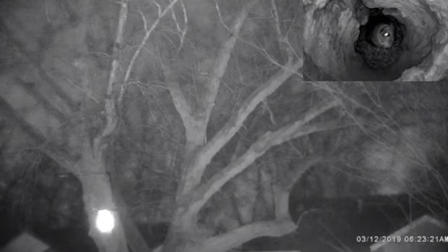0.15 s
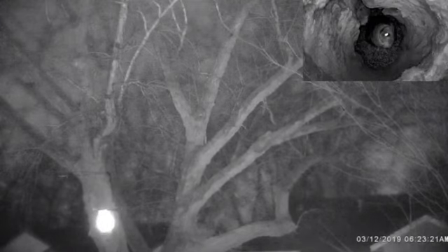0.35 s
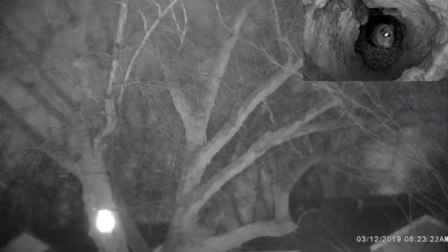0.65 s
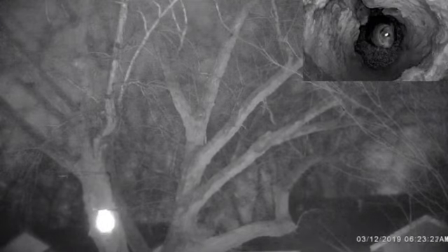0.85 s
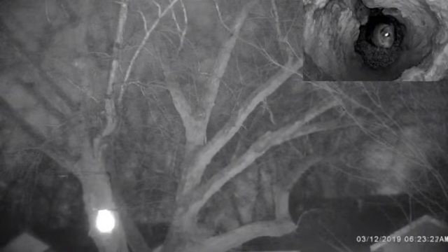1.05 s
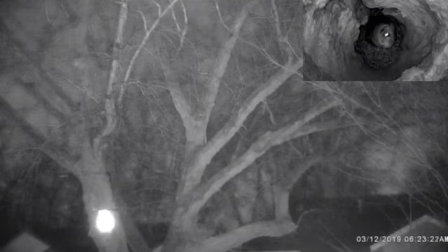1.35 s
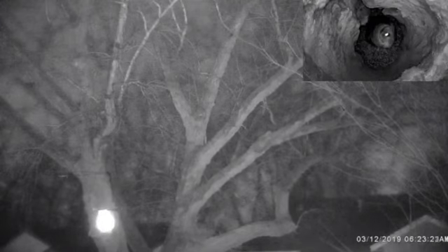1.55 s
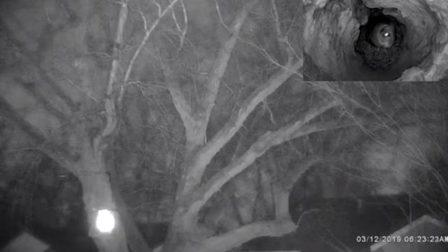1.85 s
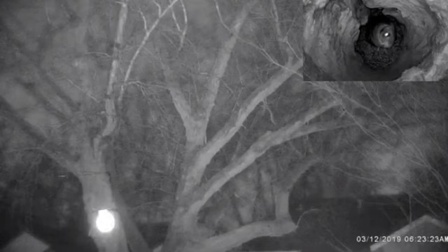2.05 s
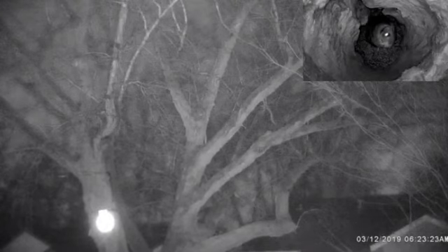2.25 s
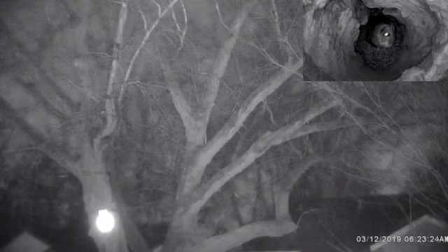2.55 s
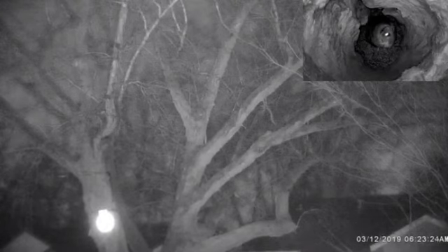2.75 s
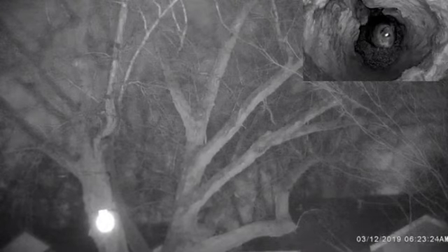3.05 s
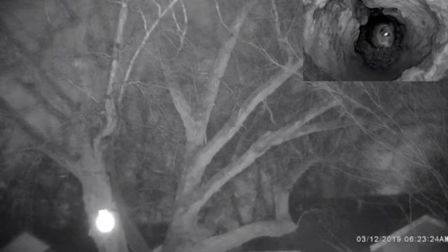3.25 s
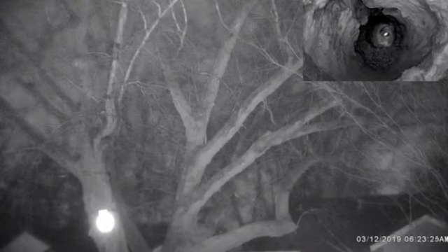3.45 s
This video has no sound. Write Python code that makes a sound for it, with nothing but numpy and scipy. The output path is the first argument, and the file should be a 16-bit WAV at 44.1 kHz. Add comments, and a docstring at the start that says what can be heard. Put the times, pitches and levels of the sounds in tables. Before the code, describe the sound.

A barred owl calls close by at night: nine quick, evenly spaced rising hoots, then one long swooping, quavering note. Soft low thumps and knocks on wood accompany the early hoots; faint hum and quiet air behind.

```python
"""Faint hum and night air come first; then a barred owl calls, close, in a hollow tree: nine quick rising
hoots, then a long note that swoops up, holds, drops an octave and quavers away. Soft thumps, knocks and
scratches on wood accompany the first hoots. The voice is a source-filter model: pulse trains and gated
noise, coloured by throat and hollow. Thumps are short swells of sine and dull noise, knocks are
band-passed clicks, scratches and air are filtered noise, hum and ringing are sines."""
import sys
import numpy as np
from scipy import signal
from scipy.fft import rfft, irfft, next_fast_len
from scipy.io import wavfile

SR = 44100
rng = np.random.default_rng(int(sys.argv[2]) if len(sys.argv) > 2 else 0)


def dump(signal):
    """Clip the signal to [-1, 1] and save it as 16-bit WAV at the path in sys.argv[1]."""
    limited = np.clip(np.atleast_2d(signal).T, -1, 1)
    pcm = np.round(limited * 32767).astype(np.int16)
    wavfile.write(sys.argv[1], SR, pcm)


N = 160965
TIME = np.arange(N) / SR  # s
TINY = 1e-18  # keeps the filters out of very slow, minute numbers


def from_db(db):
    """Logarithmic level: decibels to amplitude gain."""
    return 10 ** (np.asarray(db) / 20)


def rms_one(x):
    """Power normalisation: scale to an rms of one."""
    return x / np.sqrt(np.mean(x ** 2) + 1e-20)


def colour(x, spectrum):
    """Minimum-phase filtering: a causal response with the gains of a (f/Hz, level/dB) table."""
    size = 2 * next_fast_len(N)
    hz, db = np.transpose(spectrum)
    bin_hz = np.arange(size // 2 + 1) * SR / size
    gain_db = np.interp(np.log(bin_hz + 1), np.log(hz), db)
    cepstrum = irfft(np.log(from_db(gain_db)))
    # folding the cepstrum onto positive times makes the response causal
    cepstrum[1:size // 2] *= 2
    cepstrum[size // 2 + 1:] = 0
    response = np.exp(rfft(cepstrum))
    return irfft(rfft(x, size) * response)[:N]


def noise(spectrum):
    """Spectral shaping: coloured random noise with an rms of one."""
    return rms_one(colour(rng.standard_normal(N), spectrum))


def drift(rate_hz):
    """Low-passed randomness: a slow wander with an rms of one."""
    low_pass = signal.butter(2, rate_hz, fs=SR, output="sos")
    return rms_one(signal.sosfilt(low_pass, rng.standard_normal(N)))


def resonance(x, hz, width_hz, order=3):
    """Band-pass resonance: steep sides and a gain of one at the top."""
    edges = [hz - width_hz / 2, hz + width_hz / 2]
    band = signal.butter(order, edges, "band", fs=SR, output="sos")
    return signal.sosfilt(band, x + TINY)


# Spectrum of still air, before scaling to AIR_DB: f/Hz, level/dB
AIR_SPECTRUM = [(12, -36.5), (30, -12.5), (62, -5), (100, -17.5), (160, -14), (320, -27), (600, -31.5),
                (900, -29.5), (1400, -39.5), (2200, -45.5), (4200, -61), (11000, -66.5)]
AIR_DB = -61  # rms level
# Steady electrical tones: f/Hz, rms level/dB
HUM_TONES = [(59.8, -64), (1933, -93)]
# Faint ringing tones: start t/s, f/Hz, initial level/dB before the waver, time to fall by 60 dB t/s
RINGING_TONES = [(0, 2803, -85, 5), (0.043, 1409, -64.5, 2.5)]
RING_ONSET_S, RING_WAVER_DB, RING_WAVER_HZ = 0.0029, 3, 16


def night():
    """Superposition: still air as coloured noise, hum as sines, and wavering, decaying ringing."""
    out = from_db(AIR_DB) * noise(AIR_SPECTRUM)
    for hz, db in HUM_TONES:
        out += from_db(db) * np.sqrt(2) * np.sin(2 * np.pi * hz * TIME)
    for start, hz, db, t60 in RINGING_TONES:
        age = TIME - start
        onset = np.clip(age / RING_ONSET_S, 0, 1)
        decay = np.exp(-np.log(1000) * age / t60)
        waver_db = RING_WAVER_DB * drift(RING_WAVER_HZ)
        out += from_db(db + waver_db) * onset * decay * np.sin(2 * np.pi * hz * age)
    return out


def swell(start, peak_s):
    """Critically damped response: a soft contact rises to one after peak_s, then dies away."""
    age = np.clip((TIME - start) / peak_s, 0, 40)
    return age * np.exp(1 - age)


# Rumble between the thumps: t/s, rms level/dB
RUMBLE_LEVELS = [(0, -60), (.32, -53.5), (.37, -31), (.55, -36.5), (.93, -33.5), (1.01, -43), (1.12, -43),
                 (1.22, -34), (1.33, -51.5), (1.39, -47.5), (1.52, -34), (1.62, -48.5), (1.76, -55.5),
                 (2.1, -79)]
# Spectrum of the rumble, before scaling to an rms of one: f/Hz, level/dB
RUMBLE_SPECTRUM = [(12, -17.5), (25, -0.5), (60, 0.5), (120, -7), (200, -15.5), (350, -35), (700, -62.5),
                   (2000, -80)]


def rumble():
    """Amplitude modulation: low noise follows a level curve."""
    level_db = np.interp(TIME, *np.transpose(RUMBLE_LEVELS))
    return from_db(level_db) * noise(RUMBLE_SPECTRUM)


# Soft thumps against the wood: start t/s, level of the swell at its peak/dB, f/Hz
SOFT_THUMPS = [(0.353, -21.5, 81), (0.394, -22.5, 100), (0.403, -20.5, 65), (0.433, -15, 80),
               (0.452, -15.5, 83.4), (0.548, -21.5, 100.6), (0.630, -25, 95.5), (0.656, -27, 75),
               (0.706, -26.5, 69.6), (0.76, -28.5, 105), (0.824, -19.5, 110), (0.844, -21, 125),
               (0.893, -21.5, 100), (0.909, -24.5, 91), (0.958, -26, 130.5), (0.977, -23, 97),
               (1.036, -30, 55), (1.156, -30, 90), (1.177, -20.5, 80), (1.246, -22, 89.6),
               (1.275, -30.5, 90), (1.431, -23, 98), (1.515, -25, 80), (1.536, -24, 55)]
# Spectrum of a thump's dull noise, before scaling to an rms of one: f/Hz, level/dB
SCUFF_SPECTRUM = [(20, -11.5), (60, -4), (220, -2), (350, -18.5), (520, -34), (3000, -78)]
THUMP_SWELL_S, SCUFF_DB = 0.0045, -11  # time to the peak; rms of the noise against the sine's amplitude


def thumps():
    """Heavily damped oscillation: a cycle or two of a sine, with dull noise, under a brief swell."""
    scuff = from_db(SCUFF_DB) * noise(SCUFF_SPECTRUM)
    out = np.zeros(N)
    for start, db, hz in SOFT_THUMPS:
        tone = np.sin(2 * np.pi * hz * (TIME - start))
        out += from_db(db) * swell(start, THUMP_SWELL_S) * (scuff - tone)
    return out


# Harder knocks on the wood: t/s, peak level/dB, upper edge f/Hz
HARD_KNOCKS = [(0.358, -32.5, 435), (0.436, -23.5, 413), (0.454, -29, 700), (0.647, -32.5, 395),
               (0.979, -33.5, 340)]
KNOCK_LOW_HZ = 160


def knocks():
    """Impulse response: each hard contact is one click through a band-pass."""
    out = np.zeros(N)
    for start, db, edge_hz in HARD_KNOCKS:
        click = np.zeros(N)
        click[int(start * SR)] = 1
        band = signal.butter(4, [KNOCK_LOW_HZ, edge_hz], "band", fs=SR, output="sos")
        sound = signal.sosfilt(band, click + TINY)
        out += from_db(db) * sound / np.abs(sound).max()
    return out


# Faint scratches on the wood: start t/s, rms level at the peak of the swell/dB, centre f/Hz
FAINT_SCRATCHES = [(0.403, -53, 3900), (0.452, -63.5, 3900), (0.87, -59, 5200), (0.868, -68, 6850)]
SCRATCH_SWELL_S, SCRATCH_WIDTH_HZ = 0.0022, 1440


def scratches():
    """Band-limited friction noise: each scratch is a brief swell of it."""
    white = rng.standard_normal(N)
    out = np.zeros(N)
    for start, db, hz in FAINT_SCRATCHES:
        friction = rms_one(resonance(white, hz, SCRATCH_WIDTH_HZ))
        out += from_db(db) * swell(start, SCRATCH_SWELL_S) * friction
    return out


def shuffling():
    """Superposition of contacts: rumble, soft thumps, harder knocks and faint scratches."""
    return rumble() + thumps() + knocks() + scratches()


JITTER = .0035  # rms wander of the pitch, as a share of it
JITTER_HZ = 140  # low-pass of that wander
BUZZ_DB = -22  # level of the buzz pulses where the buzz curve is 0 dB
RASP_FOLLOWS = 1.27  # rasp falls this many dB per dB of buzz, leaving clean overtones


def syrinx(t, pitch, effort_db, buzz_db, rasp_db, low_pass_hz):
    """Periodic excitation: one pulse per cycle; returns plain pulses, and buzz pulses with gated noise."""
    pitch = pitch * (1 + JITTER * drift(JITTER_HZ)[:len(t)])
    cycles = (np.cumsum(pitch) - pitch[0]) / SR
    pulse_times = np.interp(np.arange(int(cycles[-1]) + 1), cycles, t)
    # each pulse is shared between two samples, to place it between them
    whole, part = np.divmod(pulse_times * SR, 1)
    first = whole.astype(int)
    out = np.zeros((2, N))
    for row, db in enumerate((effort_db, BUZZ_DB + buzz_db)):
        strength = from_db(np.interp(pulse_times, t, db))
        out[row, first] += strength * (1 - part)
        out[row, first + 1] += strength * part
    gate = np.exp(-(cycles % 1) * 2.14)  # noise bursts with each pulse, then decays
    rasp_gain = from_db(rasp_db + RASP_FOLLOWS * buzz_db)
    out[1, np.rint(t * SR).astype(int)] += rasp_gain * gate * rng.standard_normal(N)[:len(t)]
    low_pass = signal.butter(10, low_pass_hz, fs=SR, output="sos")
    out[1] = signal.sosfilt(low_pass, out[1] + TINY)
    return out


# Rise shared by the hoots: time from the start t/s, effort level/dB, buzz level/dB
HOOT_RISE = [(0, -6.5, -11), (.008, -0.5, -8.5), (.026, 1, 6.5), (0.041, 2.5, -0.5), (.056, 0.93, 2)]
# Fall shared by the hoots: share of the fall's time, height from END_HZ (0) to the top pitch (1)
# on a log scale, effort level/dB, buzz level/dB
HOOT_FALL = [(0, 0.98, -3.5, -14), (.22, .9, -7.5, -16.5), (0.551, .47, -8, -29),
             (0.802, .18, -12.5, -32.5), (1.001, 0.0095, -16, -35)]
KNEE_S, SHOULDER_S, TOP_S = .032, .055, .078  # times of three points on the climb; the fall starts at the top
START_SHARE, END_HZ = .5, 107.66  # start pitch as a share of the knee's; foot of the fall's pitch scale
RASP_DB, RASP_FADE_DB_PER_S = -35.5, 190  # noise level where the buzz is 0 dB; its fade past the knee


def hoot(start, length, knee_hz, shoulder_hz, top_hz, level_db, top_db, buzz_db, low_pass_hz):
    """Frequency glide: pitch climbs from a creak, then sinks as effort fades; rasp clears past the knee."""
    t = TIME[(TIME >= start) & (TIME < start + length)]
    age = t - start
    rise_s, rise_effort, rise_buzz = np.transpose(HOOT_RISE)
    share, height, fall_effort, fall_buzz = np.transpose(HOOT_FALL)
    fall_s = TOP_S + share * (length - TOP_S)
    level_s = np.r_[rise_s, fall_s]

    fall_hz = END_HZ * (top_hz / END_HZ) ** height
    pitch_s = np.r_[0, KNEE_S, SHOULDER_S, fall_s]
    pitches = np.r_[START_SHARE * knee_hz, knee_hz, shoulder_hz, fall_hz]
    pitch = np.exp(np.interp(age, pitch_s, np.log(pitches)))

    at_top = top_db * np.interp(age, [KNEE_S, SHOULDER_S, TOP_S, length], [0, 1, 1, 0])
    effort = np.interp(age, level_s, np.r_[rise_effort, fall_effort])
    buzz = np.interp(age, level_s, np.r_[rise_buzz, fall_buzz])
    rasp_db = RASP_DB - RASP_FADE_DB_PER_S * np.maximum(age - KNEE_S, 0)
    return syrinx(t, pitch, level_db + at_top + effort, buzz_db + at_top + buzz, rasp_db, low_pass_hz)


QUAVER_CREST_S, QUAVER_ONSET_S = 3.135, 0.029  # first full crest; time it takes to set in before that
QUAVER_HZ = 17.3


def quaver(t):
    """Low-frequency modulation: the throat's flutter in the tail of the long note, from -1 to 1."""
    age = t - QUAVER_CREST_S
    depth = np.clip(1 + age / QUAVER_ONSET_S, 0, 1)
    return depth * np.cos(2 * np.pi * QUAVER_HZ * age)


# Closing note, before jitter and quaver: t/s, pitch f/Hz, effort level/dB, buzz level/dB,
# nasal overtone level/dB
LONG_NOTE_CURVE = [(2.857, 142.4, -7, -30.5, -6), (2.882, 238, -1.5, -7, -3),
                   (2.900, 321.8, -4, -19.5, -10.5), (2.919, 485, -4, -7, -8), (2.931, 589.3, -8.5, -22, 1),
                   (2.968, 614.4, -4, -41.5, 4.5), (3.036, 623.3, -2, -28.5, 3),
                   (3.088, 565.4, -2.5, -8.5, 3.5), (3.098, 503, -4.5, -5.5, 0), (3.104, 372, -5, -18, 3),
                   (3.113, 318.3, -4, -27, 6.5), (3.133, 283.3, -2, -16, 4.5), (3.168, 238.6, -4, -35.5, 5),
                   (3.223, 209.2, -6, -35, 3), (3.251, 209.5, -6, -37.5, 1.5),
                   (3.307, 177, -4.5, -42, -1.5), (3.345, 155.8, -4.5, -41.5, 0.5),
                   (3.384, 131.1, -4.5, -42, -4), (3.392, 129.8, -8.5, -52.5, -13.5)]
LONG_RASP_DB, LONG_LOW_PASS_HZ = -24, 3870  # noise level where its buzz is 0 dB; low-pass for the buzz
QUAVER_SHARE, QUAVER_DB, NASAL_QUAVER_DB = 0.1, 1, 1.5  # swings of pitch, effort, nasal overtones


def long_note():
    """Coupled frequency and amplitude modulation: in the low tail pitch and effort quaver together."""
    s, pitch_hz, effort_db, buzz_db, _ = np.transpose(LONG_NOTE_CURVE)
    t = TIME[(TIME >= s[0]) & (TIME < s[-1])]
    flutter = quaver(t)
    pitch = np.interp(t, s, pitch_hz) * (1 + QUAVER_SHARE * flutter)
    effort = np.interp(t, s, effort_db) + QUAVER_DB * flutter
    buzz = np.interp(t, s, buzz_db)
    return syrinx(t, pitch, effort, buzz, LONG_RASP_DB, LONG_LOW_PASS_HZ)


def nasal_level():
    """Level modulation: the long note's nasal overtones, in dB, swell with each quaver."""
    s, *_, nasal_db = np.transpose(LONG_NOTE_CURVE)
    return np.interp(TIME, s, nasal_db) + NASAL_QUAVER_DB * quaver(TIME)


# Hoots: start t/s, length t/s, pitch at the knee f/Hz, at the shoulder f/Hz, at the top f/Hz,
# relative level/dB, level change at the top/dB, relative buzz level/dB, low-pass f/Hz for the buzz
HOOT_CALLS = [(0.1995, 0.11, 247.7, 318.8, 352, -3, -1.5, -2, 2800),
              (0.5079, .120, 283.5, 353, 424, -3, -2, -0.5, 4110),
              (0.8159, .120, 302.6, 362.3, 433, -1.5, -1.5, 5, 4680),
              (1.1244, 0.12, 309.8, 387, 437, -0.5, -2.5, 2, 4520),
              (1.437, 0.12, 308, 342.8, 344.4, 0, -2.5, 4, 4460),
              (1.7508, 0.14, 307, 373.3, 410, -1, -0.5, 2.5, 4400),
              (2.0514, 0.14, 308.6, 390.4, 422.2, -1, 0, 2, 5090),
              (2.3689, 0.14, 311.8, 389.7, 434, -0.5, -1, 2.5, 4710),
              (2.6985, 0.15, 316.8, 387.8, 428.5, -2.5, 1, -3.5, 3800)]
# Colour of throat and hollow, before VOICE_DB: f/Hz, level/dB
VOICE_COLOUR = [(60, -52.5), (150, -28.5), (200, -16.5), (250, -15), (320, -16.5), (400, -12.5),
                (480, -9.5), (560, -13.5), (630, -22), (720, -24), (830, -29.5), (1000, -38.5),
                (1230, -57.5), (1550, -68), (1850, -83), (3800, -112)]
# Narrow throat resonances that open in the long note, before VOICE_DB: f/Hz, width f/Hz, level/dB
THROAT_RESONANCES = [(1444, 240, -60.5), (2565, 286, -57.5), (3220, 420, -75), (4320, 100, -82),
                     (5194, 90, -87), (7410, 130, -80)]
# Colour of the buzz of a forced call: f/Hz, level/dB
BUZZ_COLOUR = [(300, -23.5), (800, 4.5), (1300, 6), (2100, -8), (2600, -8.5), (3500, -15.5), (4400, -22)]
VOICE_DB = 33.5  # gain of voice and overtones


def owl():
    """Source-filter principle: throat and hollow colour the pulses; the long note adds nasal overtones."""
    pulses, buzz = sum(hoot(*row) for row in HOOT_CALLS)
    long_pulses, long_buzz = long_note()
    nasal = long_pulses * from_db(nasal_level())
    overtones = sum(from_db(db) * resonance(nasal, hz, width) for hz, width, db in THROAT_RESONANCES)
    voice = colour(pulses + long_pulses, VOICE_COLOUR) + overtones
    return from_db(VOICE_DB) * voice + colour(buzz + long_buzz, BUZZ_COLOUR)


def scene():
    """Linear superposition: the night, the shuffling and the owl in one channel."""
    return (night() + shuffling() + owl())[None]


CUTOFF_HZ = 8000


def record(dry):
    """Low-pass filtering: a steep cut of the top."""
    return signal.sosfilt(signal.butter(12, CUTOFF_HZ, fs=SR, output="sos"), dry)


dry = scene()
out = record(dry)
dump(out)
```